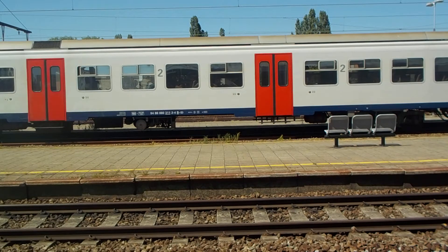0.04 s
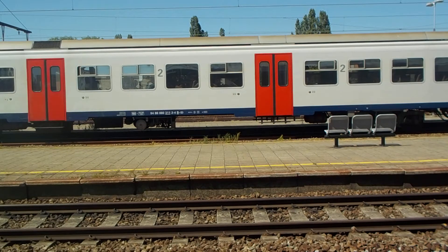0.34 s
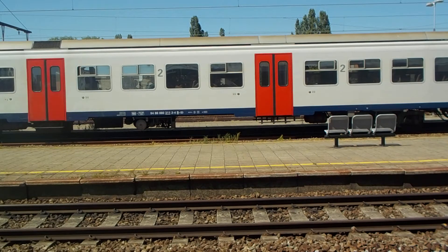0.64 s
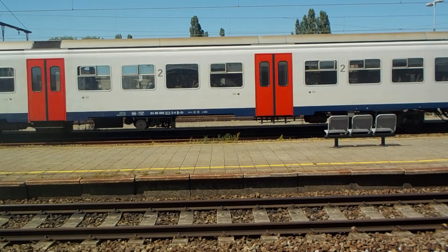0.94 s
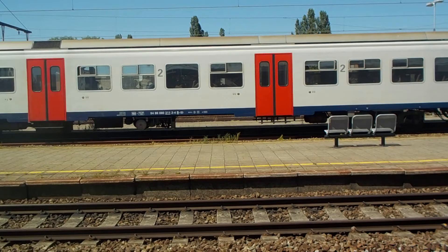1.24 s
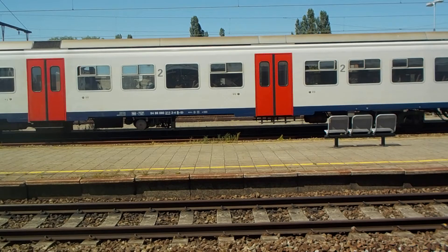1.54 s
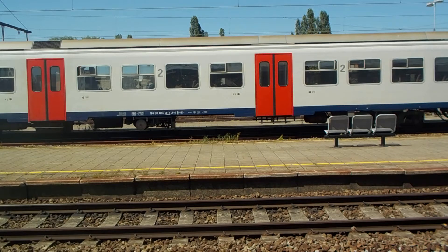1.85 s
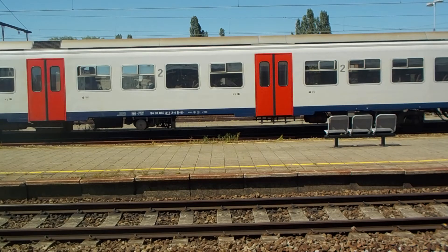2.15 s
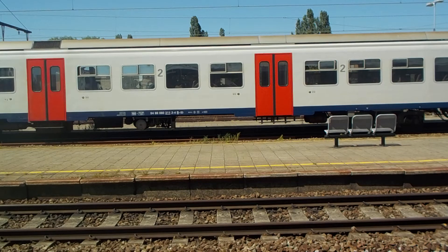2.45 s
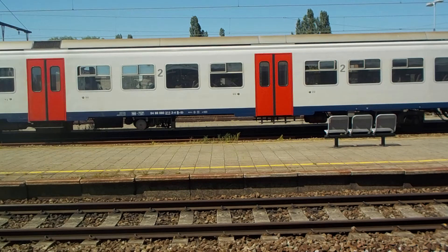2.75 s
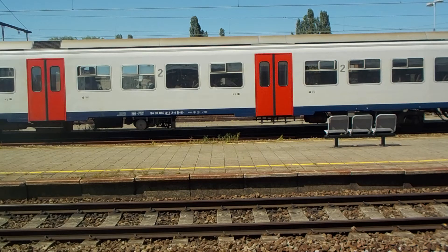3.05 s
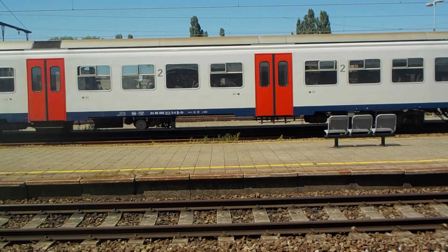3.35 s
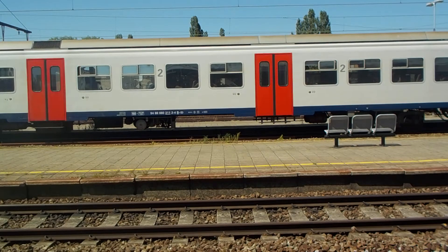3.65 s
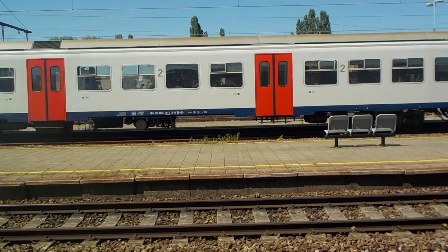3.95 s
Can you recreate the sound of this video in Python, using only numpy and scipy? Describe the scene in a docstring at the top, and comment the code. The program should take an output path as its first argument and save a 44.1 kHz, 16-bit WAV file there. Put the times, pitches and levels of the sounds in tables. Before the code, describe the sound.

Compressed air hisses from a standing train, heard from across a track and platform. Over a steady fan hum, a dull puff opens into a loud, bright hiss that swells, then eases with a faint whistle and a brief hollow rush.

```python
"""A standing train vents compressed air from under its floor, heard across a track and a platform.
Cooling fans hum from the start. Near 0.4 s a valve opens with a dull puff, and a turbulent jet swells:
a hiss over a lower roar, coloured by pipe resonances, scattered by the underframe, echoed by a wall.
After 2 s the jet sags; the outlet whistles near 3 s as the pressure falls, and a hollow rush follows
at 3.5 s. All passes through a microphone with faint noise of its own and two deep notches."""
import sys
import numpy as np
from scipy.fft import rfft, irfft, next_fast_len
from scipy.io import wavfile
from scipy.ndimage import map_coordinates

SR = 44100
rng = np.random.default_rng(int(sys.argv[2]) if len(sys.argv) > 2 else 0)


def dump_mix(stems):
    """Bounce the given channels to the path in sys.argv[1] as a 16-bit WAV at rate SR."""
    frames = np.atleast_2d(stems).T  # one column per channel
    limited = np.clip(frames, -1, 1)  # hard clip at full scale
    pcm = np.round(limited * 32767).astype(np.int16)
    wavfile.write(sys.argv[1], SR, pcm)


N = 176400

# Envelopes of the jet, its roar and the whistle: t/s, level/dB
JET_LEVEL = [(0.37, -69), (0.41, -62), (0.47, -48.5), (0.62, -41), (0.78, -35.5), (1.11, -34),
             (1.36, -31.5), (1.55, -31.5), (1.75, -31.5), (1.87, -30.5), (2.0, -30.5), (2.1, -31.5),
             (2.5, -33.5), (3.12, -35), (3.2, -37), (3.48, -38), (3.7, -40.5), (4.0, -42.5)]
ROAR_LEVEL = [(0.42, -62), (0.5, -49), (0.6, -44), (0.85, -42), (1.45, -38.5), (1.9, -39.5), (2.5, -40.5),
              (3.2, -41.5), (3.48, -42), (3.75, -43), (4, -44.5)]
WHISTLE_LEVEL = [(0.4, -100), (1.8, -55), (2.8, -58), (3.02, -47), (3.3, -69), (3.72, -53), (4.0, -66)]
# Envelope of the sizzle relative to the jet: t/s, level/dB
SIZZLE_LEVEL = [(0.45, -26), (0.75, -14.5), (1.1, -13), (1.35, -11), (1.65, -14.5), (1.92, -12),
                (2.35, -17), (2.65, -15.5), (3.1, -17.5), (4, -17)]
# Spectral densities of the noises: f/Hz, relative level/dB
HISS_SPECTRUM = [(600, -70), (1500, -69), (2300, -29), (2600, -13), (2800, -11.5), (3020, -31.5),
                 (3350, -10), (3900, -11), (4500, -9), (5000, -7.5), (5600, -6.5), (6400, -1), (7000, -4.5),
                 (7700, -4.5), (8600, -15), (10000, -32), (13000, -65)]
CORE_SPECTRUM = [(1000, -80), (3000, -54), (4400, -0.5), (5200, 1.5), (5900, 6.5), (6600, 9.5), (7050, 6),
                 (7800, -18), (9000, -42), (13000, -58)]
SIZZLE_SPECTRUM = [(1500, -70), (5000, -33), (8000, 2.5), (9100, 5.5), (10000, -3), (11400, -10.5),
                   (11750, -12), (12100, -25), (13100, -21), (13800, -20), (15300, -53)]
ROAR_SPECTRUM = [(100, -46), (300, -26), (550, -12), (850, -5.5), (1050, 2.5), (1400, -0.5), (1700, 1),
                 (2050, 0), (2400, -21.5), (3200, -8), (6000, -50)]
PUFF_SPECTRUM = [(1800, -39), (2550, 6.5), (3000, -7), (3600, 1), (6000, -20)]
HOLLOW_SPECTRUM = [(200, -37), (450, -10), (650, -2), (1250, 1.5), (1600, 3), (2500, -45)]
FAN_SPECTRUM = [(20, -31), (100, -29.5), (140, -22.5), (200, -10), (260, -9), (340, -2.5), (600, 0),
                (1000, 2), (1180, 0.5), (1330, 3), (1800, -4), (2200, -15.5), (2750, -13.5), (3000, -22),
                (3350, -17), (4500, -19.5), (5600, -29), (6600, -41), (7600, -51), (9500, -48)]
SELF_NOISE_SPECTRUM = [(20, -14), (7000, -22), (9500, -0.5), (12000, 3), (16000, 4)]
# Resonances of the outlet and the space around it: f/Hz, width/Hz, gain/dB
OUTLET_MODES = [(1078, 24, 4), (1336, 12, 6), (1410, 30, 7.5), (1647, 16, 3), (4272, 40, 4), (4502, 40, 4),
                (4762, 40, 3), (5358, 60, 5), (5540, 25, 4), (5875, 70, 3.5), (6055, 25, 3), (6286, 16, 4),
                (6455, 30, 4.5), (6627, 27, 2.5), (6784, 22, 2.5), (6876, 20, 4)]
# Burst envelopes: start/s, attack/s, hold/s (if negative, skips into the release), release/s, level/dB
PUFF_ENVELOPE = (0.43, 0.15, -0.08, .2, -50)
HOLLOW_ENVELOPE = (3.51, .045, .11, .05, -42.5)
# Fan tones: f/Hz, initial level/dB
FAN_TONES = [(158, -80), (325, -72), (418, -72.5), (533, -73), (651, -66.5), (812, -67), (1077.5, -55),
             (1302, -71)]
# Coherence between the left and right microphone channels: f/Hz, coherence/1
STEREO_COHERENCE = [(100, 0.97), (1000, 0.99), (2450, 0.98), (3000, 0.78), (3500, 0.89), (6000, 0.92),
                    (8000, 0.72), (11000, 1)]
# Level difference between the channels: f/Hz, left minus right level/dB
STEREO_BALANCE = [(60, 1), (250, -2.5), (1100, -3), (2000, -1.5), (2650, 2), (3050, -6.5), (4000, -7.5),
                  (5500, -4), (5900, -6.5), (6450, 5.5), (6850, 3), (7550, 4), (8100, -1.5), (9500, -3.5),
                  (11500, -0.5)]
# Phase difference between the channels: f/Hz, lead of the left/rad
STEREO_PHASE = [(2500, 0), (2900, -1.3), (3150, -0.5), (4200, 0.3), (5000, 0.89), (6100, 1.06),
                (6600, 0.98), (7050, 0.66), (7700, -0.6), (8400, -0.45), (9000, -0.92)]
# Microphone notches: f/Hz, width/Hz
MIC_NOTCHES = [(2425, 270), (7990, 763)]


def air_jet(sputter_db=0.34, sputter_per_s=90, hiss_growth=0.99, core_growth=2.1):
    """Turbulence radiates broadband noise; its bright core grows fastest with flow, its roar lingers."""
    jet_db = curve(JET_LEVEL)
    flow_db = jet_db + sputter_db * wobble(sputter_per_s)
    peak_db = jet_db.max()
    re_peak_db = flow_db - peak_db
    hiss = amp(peak_db + hiss_growth * re_peak_db - 1) * noise(HISS_SPECTRUM, jet_path)
    core = amp(peak_db + core_growth * re_peak_db - 0.5) * noise(CORE_SPECTRUM, jet_path)
    sizzle = amp(flow_db + curve(SIZZLE_LEVEL) - 1.5) * noise(SIZZLE_SPECTRUM, jet_path)
    roar = amp(curve(ROAR_LEVEL) + 0.2 * wobble(8.46)) * noise(ROAR_SPECTRUM, jet_path)
    return hiss + core + sizzle + roar


def jet_path(hz, scatter_db=-11, t60_s=0.26, wall_db=-8.5, wall_delay_s=0.022, wall_cutoff_hz=7000):
    """Superposition: the resonant outlet's direct sound, underframe scattering and a wall reflection."""
    outlet = 1 + sum((amp(db) - 1) * resonance(hz, centre, width) for centre, width, db in OUTLET_MODES)
    t = np.arange(SR // 4) / SR
    tail = rng.standard_normal((2, len(t))) * amp(-60 * t / t60_s)
    scatter = rfft(tail / np.linalg.norm(tail[0]), 2 * (len(hz) - 1))
    delay = np.exp(-2j * np.pi * hz * wall_delay_s)
    wall = delay / np.sqrt(1 + (hz / wall_cutoff_hz) ** 2)  # a rough wall returns less treble
    return outlet * (1 + amp(scatter_db) * scatter + amp(wall_db) * wall)


def valve_puff():
    """Onset transient: the valve cracks open with a dull puff before the jet turns bright."""
    return burst(*PUFF_ENVELOPE, PUFF_SPECTRUM)


def outlet_whistle(centre_hz=4722, width_hz=42):
    """Resonance: one narrow mode of the outlet selects a breathy pitch from the noise."""
    return amp(curve(WHISTLE_LEVEL)) * noise(HISS_SPECTRUM, lambda hz: resonance(hz, centre_hz, width_hz))


def hollow_rush():
    """Band-limited noise: a brief midrange rush rises and falls as the hiss dies away."""
    return burst(*HOLLOW_ENVELOPE, HOLLOW_SPECTRUM)


def cooling_fans(fade_db_per_s=0.7, waver_db=1.84, drift_rad=0.35, rush_db=-50):
    """Amplitude and phase modulation: slowly weakening fan tones waver over a steady rush."""
    t = np.arange(N) / SR
    tones = np.zeros(N)
    for hz, db in FAN_TONES:
        level_db = db - fade_db_per_s * t + waver_db * wobble(5.1)
        phase = 2 * np.pi * hz * t + drift_rad * wobble(5.1)
        tones += np.sqrt(2) * amp(level_db) * np.sin(phase)
    return tones + amp(rush_db) * noise(FAN_SPECTRUM)


def electronics(hiss_db=-71.5, buzz_db=-75, ticks_per_s=58.7, first_tick_s=0.0094):
    """Electrical self-noise: a faint hiss and the thin buzz of a periodic pulse train."""
    tick_times = np.arange(first_tick_s, N / SR, 1 / ticks_per_s)
    ticks = np.zeros(N)
    ticks[(tick_times * SR).astype(int)] = 1
    buzz = unit(filtered(ticks, lambda hz: amp(along(SELF_NOISE_SPECTRUM, hz))))
    return amp(hiss_db) * noise(SELF_NOISE_SPECTRUM) + amp(buzz_db) * buzz


def burst(start, attack, hold, release, db, spectrum):
    """Amplitude modulation of noise by one rise and fall."""
    times = np.cumsum([start, attack, hold, release])
    return amp(db) * curve(list(zip(times, [0, 1, 1, 0]))) * noise(spectrum)


def noise(spectrum, path=lambda hz: 1):
    """Partial coherence: sum and difference of two filtered noises give a stereo pair of rms 1."""
    def response(hz):
        angle = np.arccos(np.clip(along(STEREO_COHERENCE, hz), 0, 1)) / 2
        return amp(along(spectrum, hz)) * path(hz) * np.array([np.cos(angle), np.sin(angle)])
    mid, side = filtered(rng.standard_normal((2, N)), response)
    return unit(np.array([mid + side, mid - side]))


def resonance(hz, centre, width):
    """Lorentzian curve of height 1."""
    return 1 / (1 + (2 * (hz - centre) / width) ** 2)


def filtered(x, response):
    """Linear filtering: the spectrum of x times a frequency response."""
    size = next_fast_len(N + SR // 2)
    return irfft(rfft(x, size) * response(np.fft.rfftfreq(size, 1 / SR)), size)[..., :N]


def wobble(rate):
    """Spline interpolation of random knots, rate per second."""
    return map_coordinates(rng.standard_normal(N // 20), [np.arange(N) * rate / SR], mode="wrap")


def curve(rows):
    """Linear interpolation of (t/s, value) rows at each sample."""
    return np.interp(np.arange(N) / SR, *np.transpose(rows))


def along(rows, hz):
    """Interpolation of (f/Hz, value) rows in log frequency."""
    row_hz, values = np.transpose(rows)
    return np.interp(np.log(hz + 1), np.log(row_hz + 1), values)


def amp(db):
    """Amplitude ratio of a level."""
    return 10 ** (np.asarray(db) / 20)


def unit(x):
    """Normalisation to rms 1."""
    return x / np.sqrt(np.mean(x ** 2) + 1e-20)


def scene():
    """Stereo pickup: air and fans differ in level and phase between the two microphone channels."""
    sides = np.array([[0.5], [-0.5]])
    def pickup(hz):
        return amp(sides * along(STEREO_BALANCE, hz)) * np.exp(1j * sides * along(STEREO_PHASE, hz))
    return filtered(valve_puff() + air_jet() + outlet_whistle() + hollow_rush() + cooling_fans(), pickup)


def record(dry, notch_depth=0.98, band_limit_hz=15780):
    """Transduction: the microphone adds self-noise, cuts two notches and limits the bandwidth."""
    def response(hz):
        notches = [1 - notch_depth * resonance(hz, centre, width) for centre, width in MIC_NOTCHES]
        return np.prod(notches, axis=0) * (hz < band_limit_hz)
    return filtered(dry + electronics(), response)


dry = scene()
out = record(dry)
dump_mix(out)
```